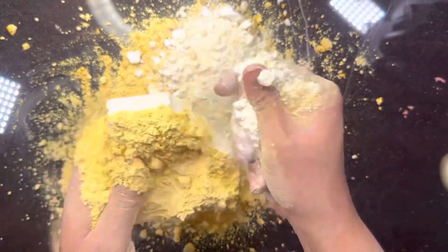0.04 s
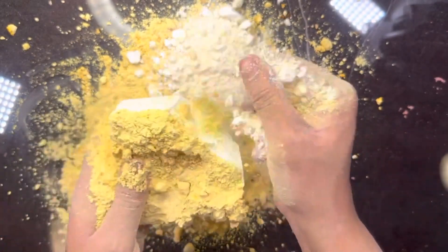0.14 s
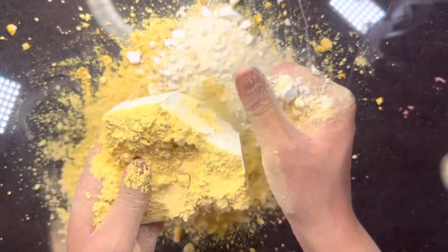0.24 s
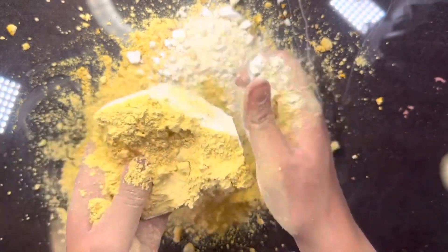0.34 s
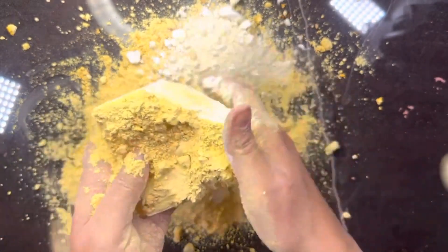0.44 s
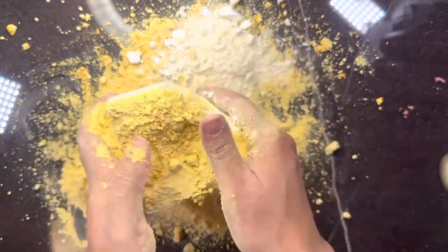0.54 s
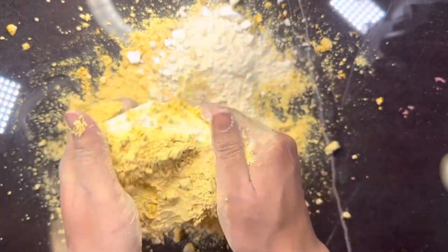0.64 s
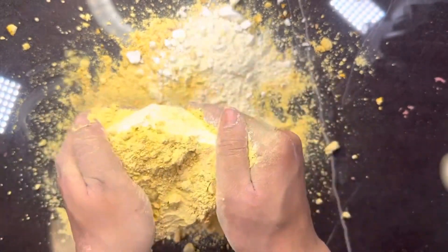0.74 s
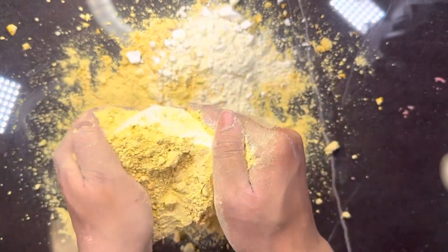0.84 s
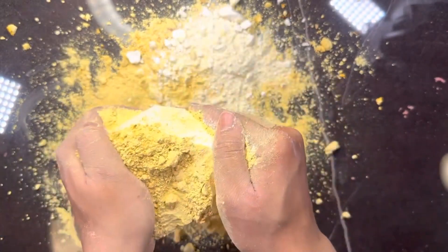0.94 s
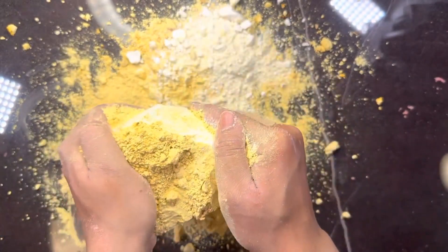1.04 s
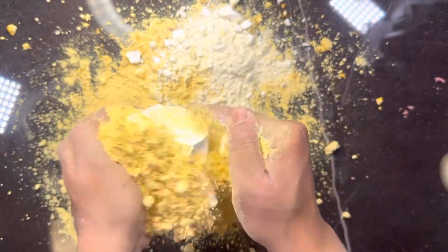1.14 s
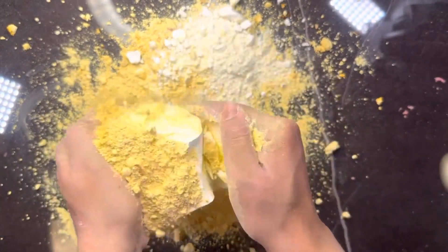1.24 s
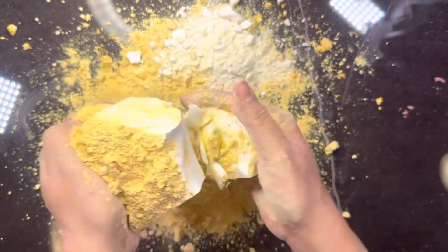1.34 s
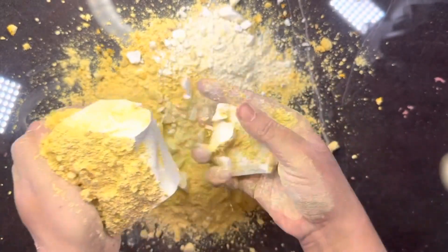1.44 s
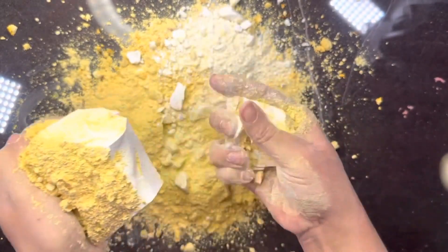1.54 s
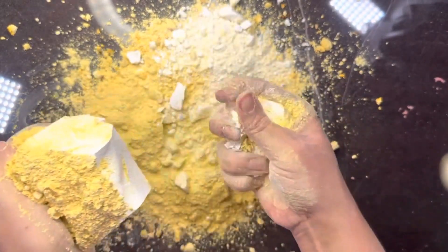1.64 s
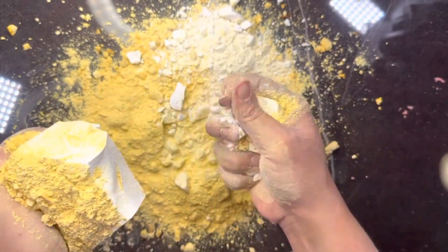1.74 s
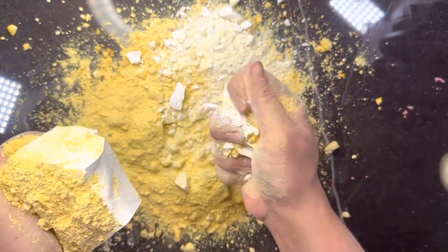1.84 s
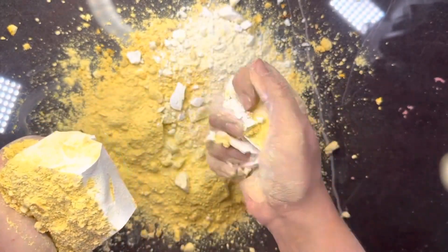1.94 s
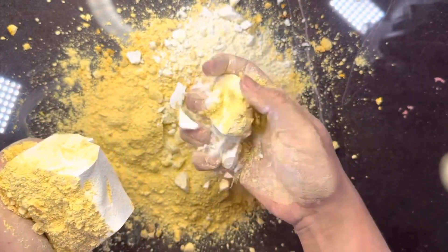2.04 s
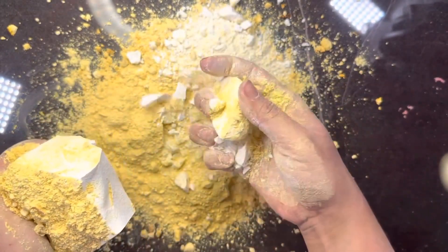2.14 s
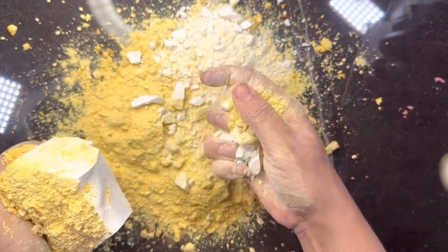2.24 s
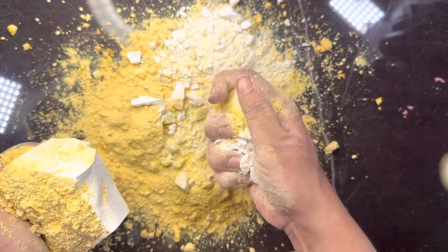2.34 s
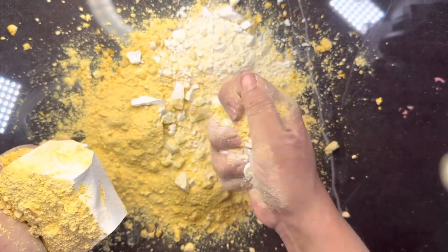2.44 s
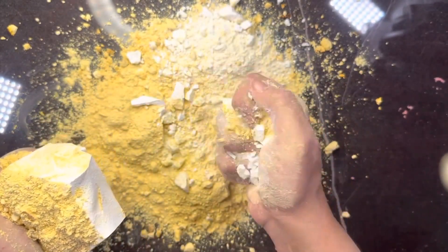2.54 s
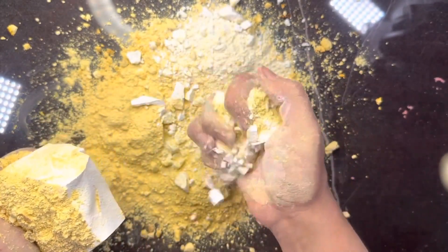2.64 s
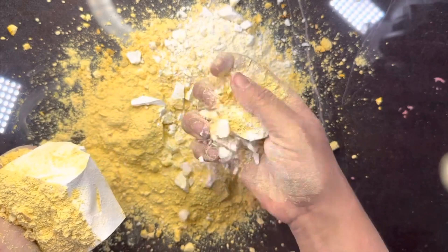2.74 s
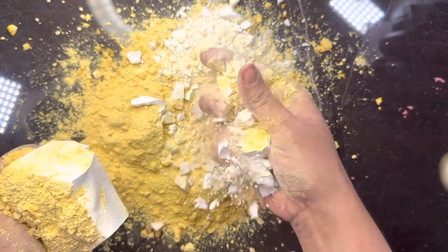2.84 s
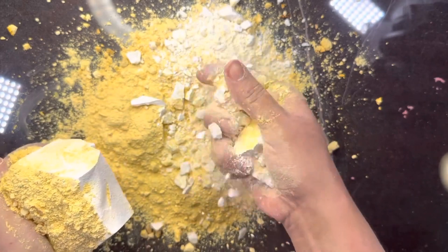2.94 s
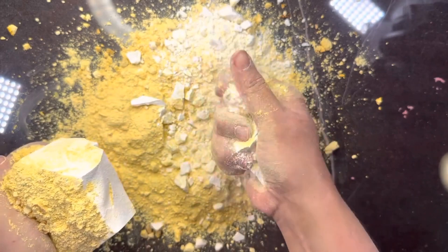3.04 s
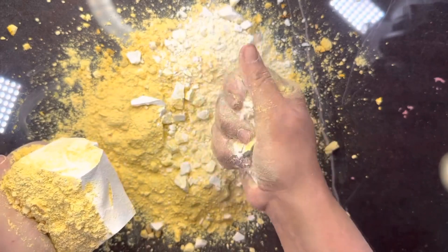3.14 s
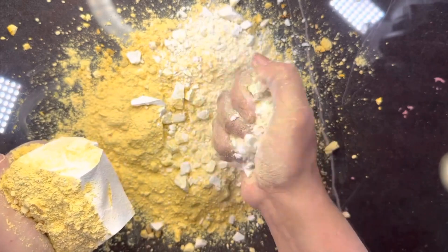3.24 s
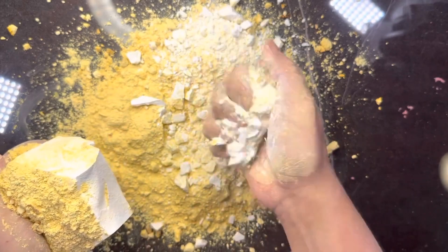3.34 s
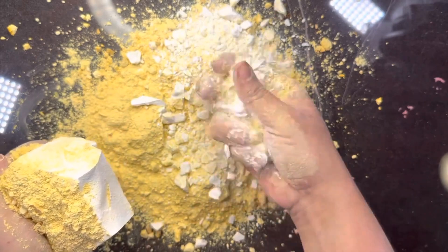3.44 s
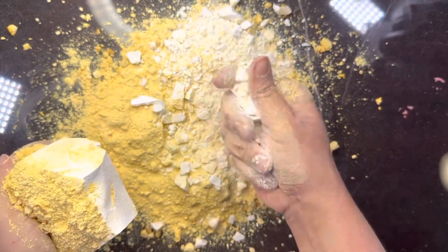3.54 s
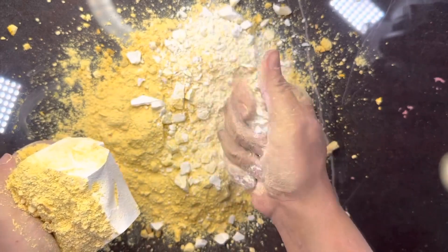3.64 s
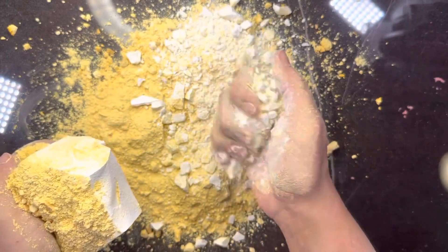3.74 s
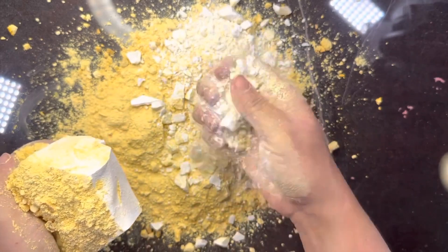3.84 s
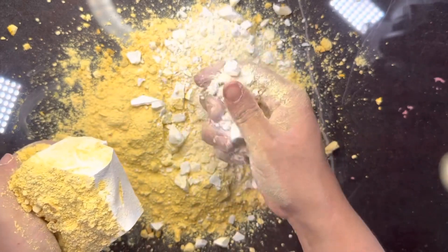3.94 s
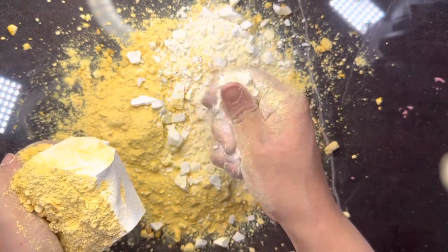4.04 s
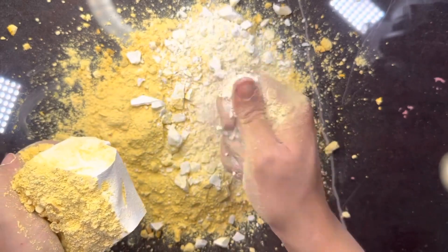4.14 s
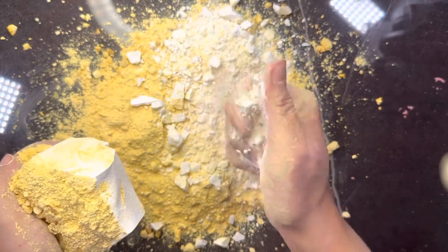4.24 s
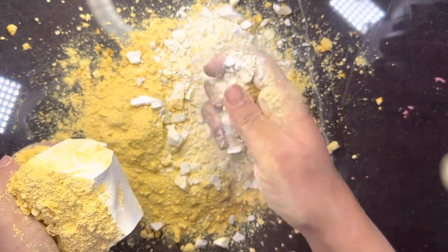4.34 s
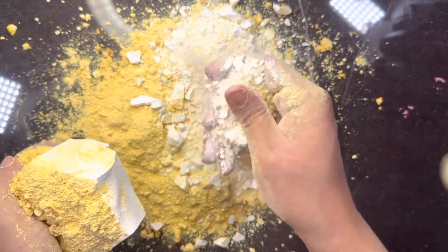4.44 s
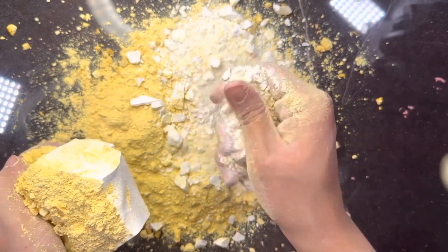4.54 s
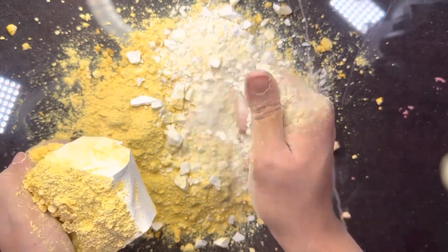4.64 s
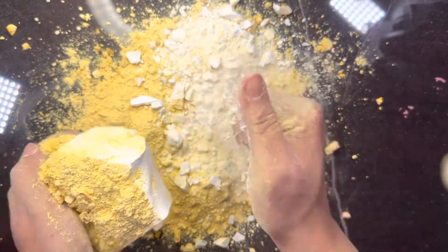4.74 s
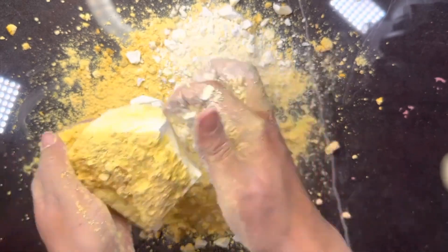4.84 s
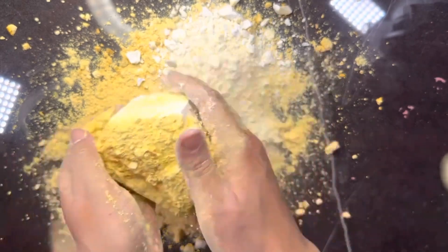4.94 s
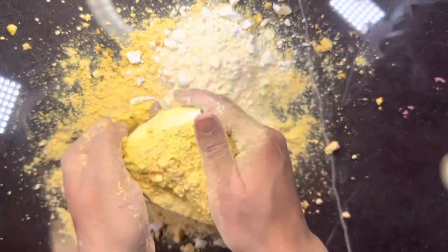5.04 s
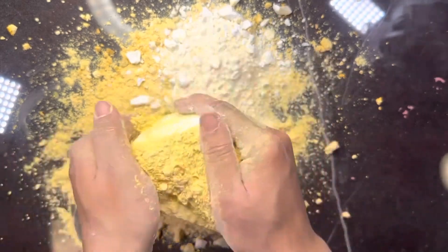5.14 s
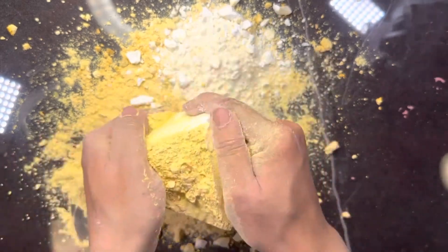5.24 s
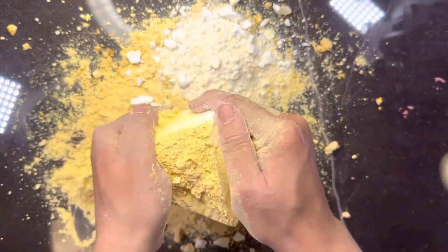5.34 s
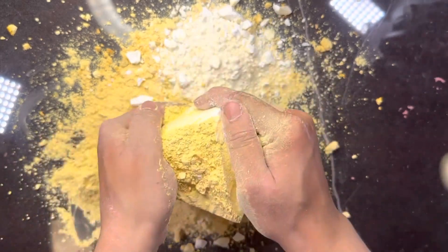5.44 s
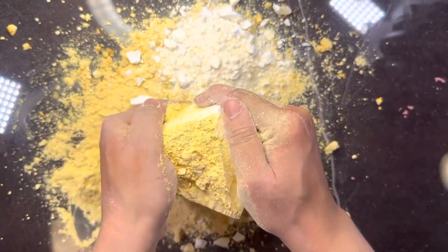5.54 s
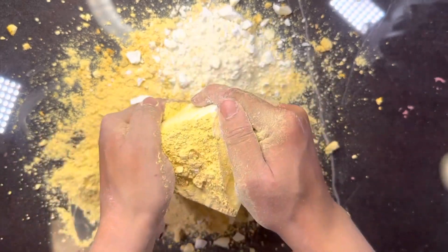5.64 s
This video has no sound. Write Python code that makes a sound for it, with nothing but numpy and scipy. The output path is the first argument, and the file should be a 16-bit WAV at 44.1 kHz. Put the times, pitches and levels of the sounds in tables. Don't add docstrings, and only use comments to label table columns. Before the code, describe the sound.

Hands rub, snap and crush a soft chalk block into powder, with gritty crunching, trickling crumbs and a final loud break thumping the table.

```python
import sys
import numpy as np
from scipy import signal
from scipy.fft import rfft, irfft, next_fast_len
from scipy.io import wavfile
from scipy.ndimage import uniform_filter1d

SR = 44100
rng = np.random.default_rng(int(sys.argv[2]) if len(sys.argv) > 2 else 0)


def store_pcm(level_fs):
    pcm = np.round(np.clip(level_fs, -1, 1) * 32767).astype(np.int16)
    wavfile.write(sys.argv[1], SR, np.atleast_2d(pcm).T)


def voltage_ratio(level):
    return 10 ** (np.asarray(level, float) / 20)


N = 250929
TOP_HZ = 15600

# [low edge f/Hz, high edge f/Hz]
BANDS = [(350, 1500), (1500, 5500), (5500, 15500)]
# [t/s, level/dB, fragment ring f/Hz, weight/dB, sharpness/dB]
FIRST_CRACKS = [(0.1319, -45.5, 1170, 4, -7), (0.1488, -42.5, 8400, -8, 15), (0.544, -43.5, 6550, -2, -14),
                (1.1226, -42, 7300, 0, 9.5), (1.1249, -40.5, 7650, 0, 9), (1.128, -32.5, 5800.0, -8, -17),
                (1.136, -54, 1440, 16, 8), (1.4832, -40.5, 4350, -10.5, 8), (1.5145, -51, 8800, -13, 17.5),
                (1.5229, -31.5, 3270, -36, 5), (1.5507, -38.5, 3760, -21, -16.5),
                (1.553, -43.5, 4500.0, -25, 7), (1.5847, -36.5, 3750.0, -22, -5.5),
                (1.5876, -26.5, 3230, -15, -10), (1.6046, -36, 3500, -29, -24),
                (1.6315, -26.5, 1820.0, -2, -4.5), (1.641, -38.5, 2230, 3.5, -15.5),
                (1.6794, -42, 3360, -6, -6), (1.7876, -26.5, 1820, 0, 0), (1.795, -22.5, 2570, -29, 2),
                (1.81, -37, 1660.0, -24, -17.5), (1.8224, -36.5, 3380, -6, -18),
                (1.847, -33.5, 5300, -6, -9), (1.875, -37, 3480.0, -29, -10)]
# [t/s, level/dB, fragment ring f/Hz, weight/dB, sharpness/dB]
FIST_CRACKS = [(2.386, -52.5, 7900, -6, 14), (2.412, -46, 8400, -13, 5), (2.436, -41.5, 4360, -22, 2.5),
               (2.4445, -36.5, 8300, -11, 8.5), (2.4589, -36, 1310, -3, -7),
               (2.4865, -37.5, 6060.0, -7, 5.5), (2.5202, -34.5, 3430, -28, 2.5),
               (2.5808, -47.5, 1370.0, 4, 6), (2.5853, -38, 3370, -6.5, -1), (2.831, -44.5, 7680.0, 1, 3),
               (2.8875, -32, 2400, -18, -24), (3.0374, -37, 2360, -8, -4), (3.0635, -39, 6300, -5, -6),
               (3.085, -45.5, 8520.0, -14, 7), (3.0951, -40.5, 1610.0, -7, 1), (3.127, -33, 5500, -15, -10),
               (3.2159, -36, 5330, -16, -2.5), (3.229, -36, 3770, 5.5, 2), (3.2397, -34.5, 4610.0, -10, 0),
               (3.244, -38.5, 4460.0, 2.5, -14), (3.2574, -36.5, 5120.0, -19, -5),
               (3.2689, -35.5, 9190.0, -21, 3.5), (3.269, -41.5, 9500, -24, 6),
               (3.2834, -34.5, 4500, -31, 1)]
# [t/s, level/dB, fragment ring f/Hz, weight/dB, sharpness/dB]
LAST_CRACKS = [(3.637, -47.5, 8900, -27, 16), (3.6513, -43, 7980.0, -17, 8.5),
               (3.6755, -33.5, 3340, -26, -17), (3.6924, -40, 3300, -7, -13), (3.7067, -35, 3150, -13, -35),
               (3.7449, -40, 3700, -14, -5.5), (3.9305, -40.5, 2330, -3, -17), (3.9373, -46, 3280, 0.5, -1),
               (3.9526, -43.5, 3840.0, -2, -6), (3.9833, -45.5, 7850, -20, 7.5),
               (4.0121, -39, 3810.0, -24, -23), (4.0265, -38.5, 1560, 2, 0.5), (4.14, -50, 8750, -8, 6),
               (4.2308, -49.5, 8750, -22, 10.5), (4.4801, -43, 1460.0, 2, -5.5),
               (4.524, -46, 3260, -6, -0.5), (4.544, -48, 1650, 3.5, -1), (4.6155, -45, 2560, -0.5, -3.5),
               (4.908, -35, 3170, -2, -12.5), (4.9407, -44.5, 1180, 0, -9), (5.3104, -53, 2120, 2, 2),
               (5.6801, -25.5, 2000, 7, -9), (5.679, -36, 4600, -10, -4), (5.682, -27.5, 4540, -18, -4),
               (5.6845, -23.5, 1860, -15, -6)]
# [t/s, level/dB, ring f/Hz]
CRUMBS = [(0.038, -46, 4550), (0.053, -44.5, 2360), (0.1409, -37, 2060.0), (0.165, -38, 9030.0),
          (0.3046, -45.5, 2090), (0.4089, -41, 4500), (0.694, -39.5, 1310), (0.8098, -42.5, 1960.0),
          (1.073, -49.5, 3210.0), (1.2959, -43, 1520), (1.4118, -39, 6840), (1.5485, -36, 3910.0),
          (1.6887, -43, 7410.0), (1.701, -40, 2540), (1.7195, -35.5, 3620), (1.8827, -38.5, 5500),
          (1.889, -40.5, 8700), (1.956, -52, 1950), (2.0951, -36.5, 6700), (2.1416, -42, 1030),
          (2.1626, -37, 1460), (2.199, -36, 6550), (2.2345, -41, 3210.0), (2.245, -37.5, 6130),
          (2.2752, -40, 2290), (2.3391, -38.5, 3650), (2.3588, -38.5, 10800), (2.3976, -39, 4100.0),
          (2.6128, -48, 3540.0), (2.634, -43, 2270.0),
          (2.781, -38, 6760), (2.8, -52, 7790.0), (2.9836, -40, 8800), (3.0158, -40.5, 3910.0),
               (3.2517, -30, 2060.0), (3.382, -39, 1160), (3.5043, -40, 5520.0), (3.5326, -37, 1690),
               (3.61, -36.5, 2390.0), (3.72, -43, 6400.0), (3.948, -43, 1920), (4.0212, -35, 1770.0),
               (4.0482, -38, 2270.0), (4.0912, -45.5, 8400), (4.1356, -40, 4310.0), (4.2098, -38, 1390.0),
               (4.274, -41.5, 3960), (4.369, -43.5, 1700), (4.387, -38.5, 1570), (4.4332, -40, 6550),
               (4.459, -71, 4100.0), (4.52, -44, 7790.0), (4.6564, -55, 2160.0), (4.756, -45, 3720.0),
               (4.8947, -43, 5000.0), (4.928, -44, 2270.0), (5.026, -44, 4410), (5.2272, -39.5, 4440),
               (5.2406, -45, 5150), (5.5066, -50.5, 1030.0),
          (0.39, -50, 570),
    (1.0026, -58, 2600),
    (1.37, -45.5, 820),
    (2.62, -43, 850),
    (3.89, -41, 1000),
    (4.985, -47, 700),
    (5.465, -52.5, 1150),
    (5.639, -49, 1400),
    (5.385, -59, 3800),
    (4.2, -45, 9300),
]
# [t/s, level/dB, pitch f/Hz]
TICKS = [(0.0384, -50, 2120), (0.0549, -52, 10950), (0.0935, -61, 2120), (0.1404, -43, 11000),
         (0.2734, -51, 6170), (0.2776, -46.5, 10950), (0.3041, -51, 3670), (0.4265, -67, 3670),
         (0.4737, -56, 10950), (0.5158, -52, 1190), (0.527, -53, 10950), (0.5443, -42.5, 1160),
         (0.6934, -60, 684), (0.7388, -58.4, 3670), (0.764, -60, 10950), (0.7912, -51.6, 10950),
         (0.8186, -64.0, 670), (0.9047, -60, 2120), (1.1287, -38.8, 1200), (1.2966, -55.5, 2120),
         (1.3679, -54, 2130), (1.4063, -46.5, 6200), (1.433, -48, 6200), (1.4649, -60, 10950),
         (1.4901, -55.9, 670), (1.5225, -56.6, 670), (1.5787, -44, 6200), (1.6415, -39, 10950),
         (1.6575, -49, 3670), (1.6627, -39, 2100), (1.7196, -49.0, 6200), (1.7243, -51, 2120),
         (1.7311, -53.6, 2120), (1.764, -51, 3670), (1.8762, -44.5, 6200), (1.9543, -54, 6200),
         (1.9705, -60, 666), (2.1085, -61, 1200), (2.1421, -58.0, 2120), (2.1621, -52, 10950),
         (2.1693, -50, 6200), (2.1815, -61, 670), (2.2337, -47, 6200), (2.2494, -48, 10950),
         (2.2743, -55, 2120), (2.3247, -56.1, 3670), (2.3459, -48, 2120), (2.3901, -41, 6200),
         (2.3978, -47, 1210), (2.4178, -52.5, 2120), (2.4255, -51, 6200), (2.4444, -35, 3640),
         (2.4819, -51.5, 664), (2.4858, -50, 670), (2.4928, -45.1, 10950), (2.5143, -56, 2120),
         (2.5203, -53, 670), (2.5248, -41, 6200), (2.6123, -49, 2120), (2.6375, -55.7, 10950),
         (2.6412, -50, 6200), (2.7488, -47.5, 10950), (2.7557, -45, 6200), (2.7944, -54.2, 2120),
              (2.7996, -42, 6200), (2.8241, -50, 2120), (2.8543, -55, 6200), (2.8874, -34.5, 5800),
              (2.9144, -50, 10950), (3.0146, -61, 670), (3.206, -47, 3670), (3.293, -52, 2120),
              (3.3027, -49, 3670), (3.3624, -56, 3670), (3.3746, -61.0, 2120), (3.4247, -54.5, 6200),
              (3.4487, -56.6, 3670), (3.5045, -47, 10950), (3.5128, -56, 2120), (3.5559, -51.3, 3670),
              (3.5714, -60, 670), (3.5878, -48, 6200), (3.6502, -42, 1190), (3.6749, -36.5, 2100),
              (3.6839, -44, 10950), (3.8116, -65, 3670), (3.8894, -54.7, 2120), (3.9306, -65, 670),
              (3.9478, -45, 3670), (4.0209, -53.6, 10950), (4.0301, -44, 3670), (4.0645, -48, 1210),
              (4.0835, -54, 10950), (4.0957, -53, 10950), (4.1047, -57.2, 10950), (4.1244, -57.0, 10950),
              (4.1353, -50.0, 10950), (4.2743, -55, 10950), (4.3174, -58, 3670), (4.4402, -54, 2120),
              (4.4574, -66, 670), (4.4671, -57, 6200), (4.4958, -55, 10950), (4.6153, -47.0, 660),
              (4.621, -53, 666), (4.6594, -58, 6200), (4.7559, -49, 6200), (4.7614, -51.5, 670),
              (4.7704, -51, 3670), (4.8784, -56, 3670), (4.9121, -46, 6200), (4.948, -50, 6200),
              (4.9829, -65, 6350), (4.9904, -56.9, 3630), (5.0089, -56, 3730), (5.0241, -51, 6200),
              (5.0505, -59, 670), (5.171, -59, 1200), (5.264, -68, 3670), (5.3798, -64, 3670)]
# [most pressure t/s, level/dB, swell/(dB/s), release/(dB/s), fineness/dB]
SQUEEZES = [(0.03, -58.5, 105, 23, -3.5), (.146, -58, 59, 12, 0.5), (.41, -77, 32, 33, -5),
            (.54, -60, 119, 72, 9), (.644, -63, 71, 118, -5), (.797, -59, 86, 193, -0.5),
            (1.309, -64, 191.5, 10, 5), (1.49, -63, 504, 61, 10.5), (1.618, -53, 75, 203, -2.5),
            (1.76, -80, 28, 156, -17), (1.893, -52, 42, 500, -1), (2.005, -66, 94, 111, -2.5),
            (2.3, -59.5, 43, 49, 1), (2.6, -53.5, 130, 177, 0), (2.89, -52, 45, 188, 0.5),
            (3.092, -50, 104, 105, 0.5), (3.265, -43.5, 323, 476, -2), (3.71, -47.5, 48.5, 358, 0),
            (3.87, -58.5, 144, 45, 0), (4.045, -54, 166, 234, -4), (4.2, -56, 77, 157, -3.5),
            (4.52, -62.5, 14, 44, -1.7), (4.78, -53.5, 38, 138, -1.5), (5.055, -59, 79, 89, 5.5),
            (5.24, -74, 46, 75, -9.5)]
# [t/s, level/dB, dying/(dB/s), fineness/dB]
SPILLS = [(1.128, -40.5, 420, 0.5), (1.15, -57, 190, -10), (1.17, -78, 78, 9), (1.648, -46.5, 200, -5),
          (1.796, -42, 188, -3), (2.466, -51.5, 125, -3), (3.385, -63.5, 40, -1), (3.49, -57.5, 58, -3),
          (5.312, -68, 500, 4), (1.17, -76, 203, -5.5), (.838, -82, 200, -3), (3.935, -63, 125, -9),
          (4.914, -54, 168, -3)]
# [f/Hz, density level/dB]
POWDER_COLOUR = [(350, 1), (600, -4), (1000, -0.5), (1500, -1), (2500, -3), (5500, -3.5), (9000, -2),
                 (12000, -9.5), (15500, -6)]
# [f/Hz, width/Hz, gain (below zero a dip)]
HOLLOW = [(850, 80, 0.46), (1326, 136, -0.5), (1510, 420, 0.51), (2430, 50, 0.75), (3350, 1500, 0.31)]
# [t/s, slip rate f/Hz, level/dB]
SQUEAK = [
    (.5, 2120, -76),
    (0.529, 2080, -52.5),
    (.56, 2140, -61),
    (0.614, 2180, -73),
    (0.625, 2300, -54),
    (0.655, 2250, -56),
    (0.68, 2200, -64),
]
# [t/s, level/dB, contact/ms]
JOLTS = [(1.1209, -26, 1), (1.1296, -22, 3.9), (1.138, -25.5, 0.9), (1.157, -41, 0.58),
         (1.172, -38.5, 0.71), (1.586, -45, 1.1), (1.63, -28, 0.48), (1.788, -32, 0.96), (1.848, -50, 0.87),
         (2.459, -45, 1.2), (2.887, -46.5, 1.4), (3.229, -34.5, 1.4), (3.24, -40, 0.31), (3.256, -54, 0.59),
         (4.026, -41, 3.5), (4.615, -45.5, 0.32), (5.679, -11, 0.46), (5.6885, -41, 0.49)]
# [f/Hz, level/dB, t60/s]
TABLE_MODES = [(190, -8, 0.094), (298, -3.5, 0.067), (417, 3, 0.024), (610, -7.5, 0.021),
               (878, -1.5, 0.014)]
# [t/s, f/Hz, level/dB, t60/s]
SINGLE_MODES = [(1.12, 166, -26, 0.061), (4.336, 78, -44, 0.45), (4.743, 76, -40, 0.7), (4.91, 157.2, -30.5, 0.17),
                (5.2, 73.3, -44, 0.33), (1.123, 1430, -42, .16), (1.124, 1020, -44, 0.15), (1.124, 190, -33, .05),
                (3.229, 1700, -42, 0.01), (3.2395, 1610, -37, 0.017), (3.269, 1650, -43, .015),
                (3.284, 1650, -41, 0.022), (5.6815, 4700, -30, .012), (1.631, 240, -46, 0.024),
                (1.787, 330, -39, .03), (3.229, 690, -36, .025), (4.615, 477, -45, 0.027),
                (5.311, 2000, -51, 0.042), (5.68, 554, -18, .02)]
# [f/Hz, density level/dB]
ROOM_COLOUR = [(10, -7), (30, 3), (46, 0), (55, -10.5), (74, 0.5), (90, -11), (105, -5.5), (122, -7),
               (160, -8.5), (205, -17), (260, -23.5), (400, -31.5), (1000, -40), (5000, -44.5),
               (15500, -46.5)]
# [f/Hz, rms level/dB]
MOTOR = [(24.02, -53.5)]


def rms_one(x):
    return x / np.sqrt(np.mean(x ** 2) + 1e-20)


def band(k):
    return signal.butter(2, BANDS[k], "band", fs=SR, output="sos")


def resonance(x, hz, width_hz):
    r = np.exp(-np.pi * width_hz / SR)
    poles = [1, -2 * r * np.cos(2 * np.pi * hz / SR), r * r]
    return signal.lfilter([(1 - r * r) / 2, 0, (r * r - 1) / 2], poles, x)


def hollow(x):
    return x + sum(gain * resonance(x, hz, width_hz) for hz, width_hz, gain in HOLLOW)


def colour(x, points):
    size = next_fast_len(N)
    hz = np.maximum(np.arange(size // 2 + 1) * SR / size, 1)
    point_hz, point_db = np.transpose(points)
    shape = voltage_ratio(np.interp(np.log(hz), np.log(point_hz), point_db))
    audible = (hz > 8) * (hz < TOP_HZ)
    return rms_one(irfft(rfft(x, size) * shape * audible, size)[:N])


def drift(rate_hz):
    r = np.exp(-2 * np.pi * rate_hz / SR)
    wander = signal.lfilter([1], [1, -2 * r, r * r], rng.standard_normal(N + SR))
    return rms_one(wander[SR:])


def fractures():
    loss_db_per_octave, crumb_trim_db = 8, -4
    events = []
    for s, db, hz, weight_db, sharp_db in FIRST_CRACKS + FIST_CRACKS + LAST_CRACKS:
        events.append((s, db + weight_db, db, db + sharp_db, hz))
    centres_hz = np.sqrt(np.prod(BANDS, axis=1))
    for s, db, hz in CRUMBS:
        octaves_away = abs(np.log2(hz / centres_hz))
        levels_db = db + crumb_trim_db - loss_db_per_octave * octaves_away
        events.append((s, *levels_db, hz))
    return events


def cracks(tail_s=0.012, tail_db=-18, ring=2.2, sharpness=4.5, cupped=0.49):
    snap_s, slope_hz = (0.0014, 0.0006, 0.0003), (1000, 4000, 12500)
    out, t = np.zeros(N + 2048), np.arange(2048) / SR
    events = fractures()
    noise = rng.standard_normal((len(events), 3, 2048))
    noise[:, :, 1] = 3.0 * np.array([-1, 1, -1])
    for (s, *levels_db, ring_hz), bursts in zip(events, noise):
        at = round(s * SR)
        for k, burst in enumerate(bursts):
            snap = burst * (np.exp(-t / snap_s[k]) + voltage_ratio(tail_db) * np.exp(-t / tail_s))
            fragment = ring * resonance(snap, ring_hz, ring_hz / sharpness)
            cupped_hand = cupped * resonance(snap, 907, 320)
            snap = signal.sosfilt(band(k), hollow(snap + fragment + cupped_hand))
            snap = signal.lfilter(*signal.butter(1, slope_hz[k], fs=SR), snap)
            strength = np.sqrt(np.sum(snap[:110] ** 2) / 88)
            out[at:at + 2048] += voltage_ratio(levels_db[k]) * snap / strength
    return out[:N]


def pressure(k):
    swell_bend, release_bend, bend_s = 1.05, 1.21, 0.032
    linger = (1, 1, 0.96)[k]
    spill_rise_db_per_s = 3499
    time, power = np.arange(0, N + 64, 64) / SR, 0
    spills = [(s, db, spill_rise_db_per_s, dying, fine_db) for s, db, dying, fine_db in SPILLS]
    for s, db, swell, release, fine_db in SQUEEZES + spills:
        away = abs(time - s) / bend_s
        before = swell * away ** swell_bend
        after = release * linger * away ** release_bend
        loss_db = bend_s * np.where(time < s, before, after)
        power = power + voltage_ratio(db + (k - 1) * fine_db - loss_db) ** 2
    return np.interp(np.arange(N) / SR, time, np.sqrt(power))


def powder(per_s=1300, spread_db=3.0, colour_db=4.5, clump_db=4.5, grain_s=0.00085, hiss=0.99):
    trim_db = (-5.5, 0.1, -1.5)
    born = rng.random(N) < per_s * voltage_ratio(clump_db * drift(25)) / SR
    sizes = born * voltage_ratio(spread_db * np.minimum(rng.exponential(1, N), 2.2))
    flutter = voltage_ratio(2.0 * drift(85))
    decay = np.exp(-1 / (grain_s * SR))
    out = 0
    for k in range(3):
        coloured = sizes * voltage_ratio(colour_db * rng.standard_normal(N))
        grains = signal.lfilter([1], [1, -decay], coloured)
        activity = np.sqrt(rms_one(grains) ** 2 + hiss ** 2) * flutter
        activity /= np.sqrt(uniform_filter1d(activity ** 2, size=3000))
        dust = colour(hollow(activity * rng.standard_normal(N)), POWDER_COLOUR)
        part = rms_one(signal.sosfilt(band(k), dust))
        out = out + pressure(k) * voltage_ratio(trim_db[k]) * part
    return out


def ticks(cycles=3.3, sharpness=0.98, trim_db=-1.5):
    out, t = np.zeros(N + 1024), np.arange(1024) / SR
    events = TICKS
    bursts = rng.standard_normal((len(events), 1024))
    for (s, db, hz), burst in zip(events, bursts):
        pop = burst * np.exp(-t * hz / cycles / (1 + hz / 4000))
        pop = resonance(resonance(pop, hz, hz / sharpness), hz, hz)
        strength = np.sqrt(np.sum(pop[:110] ** 2) / 88)
        out[round(s * SR):][:1024] += voltage_ratio(db + trim_db) * pop / strength
    return out[:N]


def squeak():
    overtones_db, jitter = (-20, 0.1, -6, -4, -6), 0.05
    s, hz, db = np.transpose(SQUEAK)
    time = np.arange(N) / SR
    slip_hz = np.interp(time, s, hz) * (1 + jitter * drift(1090))
    phase = 2 * np.pi * np.cumsum(slip_hz) / SR
    tone = 0
    for number, level_db in enumerate(overtones_db, 1):
        tone = tone + voltage_ratio(level_db + 2.5 * drift(120)) * np.sin(number * phase)
    return voltage_ratio(np.interp(time, s, db, left=-200, right=-200)) * tone


def table(low_hz=120, dust_db=-38):
    pushes = np.zeros(N + SR) + 1e-18
    for s, db, contact_ms in JOLTS:
        push = np.hanning(round(contact_ms * SR / 1000) + 2)
        pushes[round(s * SR):][:len(push)] += voltage_ratio(db) * push / push.sum()
    pushes[:N] += voltage_ratio(dust_db) * pressure(0) * rng.standard_normal(N)
    out = np.zeros(N)
    for hz, level_db, t60 in TABLE_MODES:
        r, w = voltage_ratio(-60 / (t60 * SR)), 2 * np.pi * hz / SR
        poles = [1, -2 * r * np.cos(w), r * r]
        out += signal.lfilter([0, voltage_ratio(level_db) * np.sin(w)], poles, pushes[:N])
    return signal.sosfilt(signal.butter(2, low_hz, "high", fs=SR, output="sos"), out)


def single_modes(rise_cycles=1.2):
    out = np.zeros(N)
    for s, hz, db, t60 in SINGLE_MODES:
        t = np.maximum(np.arange(N) / SR - s, 0)
        build = 1 - np.exp(-t * hz / rise_cycles)
        out += voltage_ratio(db - 60 * t / t60) * build * np.sin(2 * np.pi * hz * t)
    return out


def motor():
    time, hum = np.arange(N) / SR, 0
    for hz, db in MOTOR:
        hum = hum + voltage_ratio(db + 0.96 * drift(1.3)) * np.sqrt(2) * np.sin(2 * np.pi * hz * time)
    return hum


def room(level_db=-52):
    return voltage_ratio(level_db) * colour(rng.standard_normal(N), ROOM_COLOUR)


def scene():
    snaps = cracks()
    chalk = snaps + powder() + ticks() + squeak()
    mono = chalk + table() + single_modes() + motor() + room()
    treble = signal.butter(2, [1700, 10000], "band", fs=SR, output="sos")
    side = voltage_ratio(-31) * signal.sosfilt(treble, snaps * rng.standard_normal(N))
    return np.array([mono + side, mono - side])


def top_cut(x):
    return signal.sosfilt(signal.butter(12, 16640, fs=SR, output="sos"), x)


def record(dry):
    rounded = 0.7 * np.tanh(dry / 0.7)
    finished = signal.sosfilt(signal.cheby2(10, 17, TOP_HZ, fs=SR, output="sos"), rounded)
    return top_cut(finished)


dry = scene()
out = record(dry)
store_pcm(out)
```